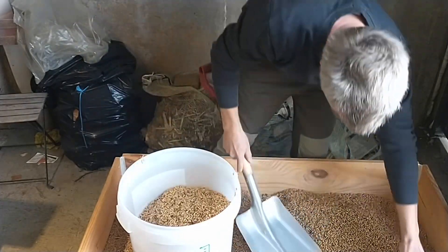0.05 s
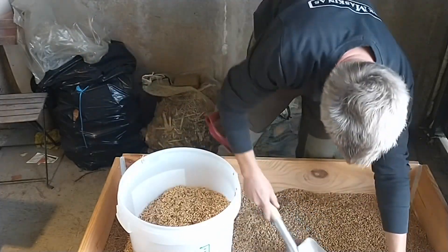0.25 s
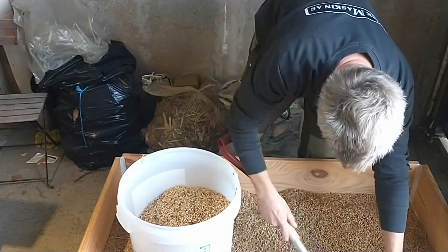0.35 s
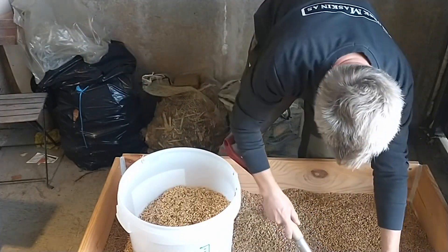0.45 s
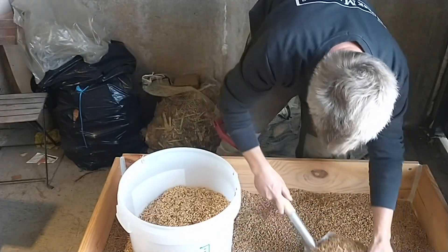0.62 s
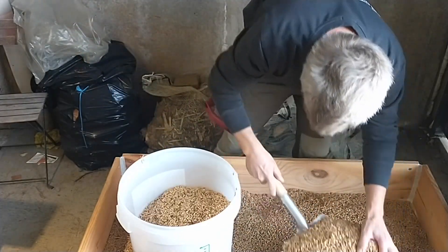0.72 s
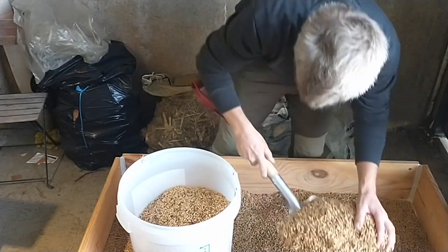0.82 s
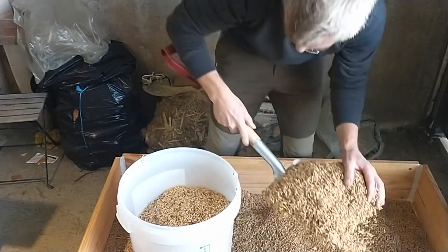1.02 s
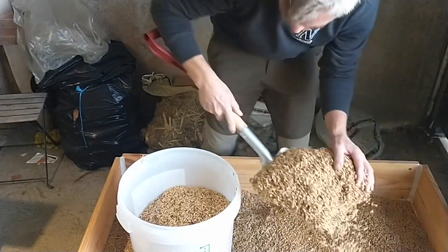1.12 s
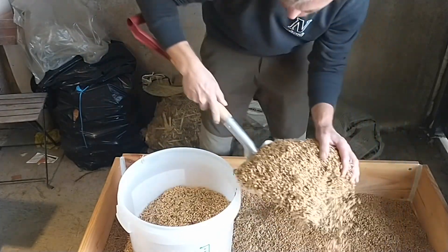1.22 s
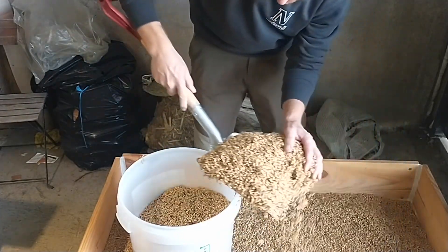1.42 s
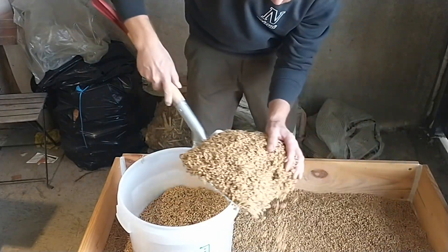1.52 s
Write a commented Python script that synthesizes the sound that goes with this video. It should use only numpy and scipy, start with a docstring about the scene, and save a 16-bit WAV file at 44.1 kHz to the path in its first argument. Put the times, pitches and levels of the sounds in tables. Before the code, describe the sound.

A metal shovel drives into loose grain with a loud, hissing crunch, its blade juddering and ringing while the wooden box booms. Then grain trickles softly off the lifted blade and stray kernels tick, close by in a small concrete room.

```python
"""A metal shovel is driven into loose grain in a wooden box, in a small concrete store room.
Kernels rush over the blade, which sticks and slips, ringing itself and the boards with jolts,
groans and a hollow boom. Then the load is lifted: it shifts on the blade, grain trickles back
onto the heap and stray kernels tick as they bounce. Bare walls echo over a faint hum."""
import sys
import numpy as np
from scipy import signal
from scipy.fft import rfft, irfft
from scipy.io import wavfile
from scipy.ndimage import uniform_filter1d

SR = 44100
rng = np.random.default_rng(int(sys.argv[2]) if len(sys.argv) > 2 else 0)


def inscribe(sig):
    """Save sig as 16-bit PCM at rate SR to the path in sys.argv[1].

    A 1-D sig is mono; a 2-D sig holds one channel per row.
    Samples are clipped to [-1, 1] before scaling.
    """
    pcm = np.round(np.clip(np.atleast_2d(sig).T, -1, 1) * 32767)
    wavfile.write(sys.argv[1], SR, pcm.astype(np.int16))


N = 68355
TIME = np.arange(N) / SR
BIN_HZ = np.arange(N + 1) * SR / (2 * N)


def amp(db):
    """Decibels to gain."""
    return 10 ** (np.asarray(db) / 20)


def unit(x):
    """Scale to rms 1."""
    return x / np.sqrt(np.mean(x ** 2))


def fader(table, column=1):
    """Gain over time from one dB column of an envelope."""
    rows = np.array(table)
    return amp(np.interp(TIME, rows[:, 0], rows[:, column]))


def per_bin(points):
    """Join (frequency, value) points on a log-frequency axis."""
    hz, value = np.array(points).T
    return np.interp(np.log(BIN_HZ + 1), np.log(hz), value)


def shape(x, gain):
    """Filter with one gain per frequency."""
    return irfft(rfft(x, 2 * N) * gain)[..., :N]


def colour(x, eq):
    """EQ a white sound and keep its power."""
    return shape(x, unit(amp(per_bin(eq))))


def noise():
    """Two unrelated white noises."""
    return rng.standard_normal((2, N))


def clicks(per_s, spread_db):
    """Two streams of random impacts of uneven size, rms 1."""
    size = amp(spread_db * np.clip(noise(), -2, 2)) * np.sign(noise())
    return unit(size * (rng.random((2, N)) < per_s / SR))


def wander(bandwidth_hz):
    """Smooth random modulation, rms 1."""
    return unit(shape(noise()[0], np.exp(-(BIN_HZ / bandwidth_hz) ** 2)))


def fade(start, decay_s):
    """Instant attack, exponential decay."""
    age = TIME - start
    return (age >= 0) * np.exp(-np.abs(age) / decay_s)


def ring(modes, t60_scale=1):
    """A body's answer to one tap: decaying sines of alternating polarity."""
    out = 0
    for k, (hz, db, t60) in enumerate(modes):
        decay = fade(0, t60 * t60_scale / np.log(1000))
        out = out + (-1) ** k * amp(db) * np.sin(2 * np.pi * hz * TIME) * decay
    return out


def convolve(x, response):
    """Play a stereo signal through a response."""
    return signal.fftconvolve(x, np.atleast_2d(response), axes=1)[:, :N]


# stereo image (frequency [Hz], left-right correlation [0-1])
CORRELATION = [(100, 0.93), (350, .88), (750, 0.49), (1500, 0.09), (3500, 0.08), (16000, 0)]
def stereo(pair, left_treble_db=0.3):
    """Blend two unrelated signals into left and right: narrow bass, wide treble."""
    alike = np.clip(per_bin(CORRELATION), 0, 1)
    blend = np.arcsin(alike) / 2
    lean = amp(np.array([[1], [-1]]) * left_treble_db * (1 - alike) / 2)
    return shape(pair, np.cos(blend) * lean) + shape(pair[::-1], np.sin(blend) * lean)


# EQ of the still air (frequency [Hz], gain [dB])
AIR_EQ = [(18, -58), (30, -12), (75, -16), (645, -24), (774, -37), (837, -6.5), (928, -18), (2250, -21.5),
          (15000, -32)]
# partials of the hum (frequency [Hz], level [dB])
HUM_PARTIALS = [(861, -93.5), (2196, -89.5)]
def room_tone(air_db=-73.5):
    """A bed of still air with a faint hum."""
    hum = sum(np.sqrt(2) * amp(db) * np.sin(2 * np.pi * hz * TIME) for hz, db in HUM_PARTIALS)
    return amp(air_db) * stereo(colour(noise(), AIR_EQ)) + hum


# envelopes of the shovel stroke (time [s], slide level [dB], crunch level [dB])
STROKE_ENVELOPE = [(.132, -93, -100), (.146, -51, -69), (.165, -43, -63), (.205, -37.5, -44.5),
                   (.246, -36, -41.5), (.254, -30.5, -38.5), (.288, -31, -39), (.3, -26, -24.5),
                   (.36, -28, -27), (.39, -25, -29.5), (.435, -30, -23.5), (.452, -29.5, -32.5),
                   (.49, -30, -32.5), (.52, -37.5, -40), (.565, -57, -54), (.635, -90, -48.5),
                   (.7, -82, -59.5), (.8, -112, -79.5)]
# EQs of the bright slide and the mid-heavy crunch (frequency [Hz], gain [dB])
SLIDE_EQ = [(300, -40), (1500, -1.5), (3000, -0.5), (4500, 0.5), (6000, -2), (8500, -3.5), (12000, -5),
            (14000, -9.5), (15500, -15.5)]
CRUNCH_EQ = [(100, -31), (220, -9.5), (420, -3), (560, -4.5), (750, -1.5), (1000, 0), (1500, -5),
             (1900, -5), (2500, -5.5), (3100, -13.5), (5000, -18.5), (16000, -31)]
def grain_rush():
    """Fine kernels hiss over the steel while coarser bursts crunch under the edge."""
    slide = clicks(per_s=9000, spread_db=5) * fader(STROKE_ENVELOPE, column=1)
    crunch = clicks(per_s=1800, spread_db=3) * fader(STROKE_ENVELOPE, column=2)
    return stereo(colour(slide, SLIDE_EQ) + colour(crunch, CRUNCH_EQ))


def stick_slip(modes, envelope):
    """Stick-slip pulses keep a body ringing; the ring is levelled, then follows the envelope."""
    body = stereo(convolve(clicks(per_s=420, spread_db=3), ring(modes)))
    power = uniform_filter1d(np.mean(body ** 2, axis=0), size=3000)
    return body / np.sqrt(power + 1e-9) * envelope


# modes of the free blade (frequency [Hz], relative level [dB], t60 [s])
FREE_BLADE_MODES = [(825, 1, .25), (985, -2.5, 0.4), (1090, -1, 0.144), (1285, 1, 0.26), (1355, 0.5, 0.28),
                    (1508, 8, 0.13), (1781, 2, 0.41), (1918, 1, 0.22), (2125, -3.5, 0.116), (2506, 3, .2),
                    (2960, 1.5, .2), (3646, 3.5, 0.45), (3812, 5.5, 0.14), (4870, 5.5, 0.14)]
# envelope of its ring (time [s], level [dB])
ENTRY_ENVELOPE = [(.135, -90), (.15, -57.5), (.21, -38), (.27, -37), (.33, -40), (.45, -39.5), (.56, -65),
                  (.7, -105)]
def blade_entry():
    """The blade scrapes in and rings freely until it is buried."""
    return stick_slip(FREE_BLADE_MODES, fader(ENTRY_ENVELOPE))


# modes of the buried blade (frequency [Hz], relative level [dB], t60 [s])
BURIED_BLADE_MODES = [(685.6, -6, 0.21), (746.4, 0.5, 0.17), (818, -5, 0.24), (857, -2.5, 0.172),
                      (918, -1, 0.096), (982.4, 1, 0.2), (1130, -2.5, 0.13), (1370, -17, 0.11),
                      (1800, -9, 0.17), (1880, -6.5, 0.13), (2163, -8, 0.14), (2320, -21, 0.07),
                      (2449, -9, 0.22)]
# envelopes of the judder (time [s], blade level [dB], board level [dB])
JUDDER_ENVELOPE = [(.14, -90, -100), (.2, -61, -66), (.28, -43.5, -43), (.31, -35.5, -37),
                   (.38, -27.5, -30.5), (.44, -35, -33), (.5, -41.5, -32.5), (.56, -57, -38),
                   (.64, -58, -47), (.76, -72, -60.5), (.9, -91, -74), (1.1, -100, -94)]
def blade_judder():
    """The buried blade sticks and slips in the grain with a darker ring."""
    return stick_slip(BURIED_BLADE_MODES, fader(JUDDER_ENVELOPE, column=1))


# modes of the wooden boards (frequency [Hz], relative level [dB], t60 [s])
BOARD_MODES = [(189.2, -1, 0.19), (242, 1, 0.27), (334.8, 3, .16), (392.6, -2.5, 0.24), (455.5, -1.5, 0.13),
               (560, -9, .1)]
def board_judder():
    """The stick-slip shakes the boards of the box."""
    return stick_slip(BOARD_MODES, fader(JUDDER_ENVELOPE, column=2))


# modes of the hollow box (frequency [Hz], relative level [dB], t60 [s])
HOLLOW_MODES = [(63.6, -7.5, 0.52), (124.5, 0.5, 0.23), (182.4, 1, 0.26)]
# envelope of its boom (time [s], level [dB])
BOOM_ENVELOPE = [(.15, -91), (.21, -60), (.27, -50), (.36, -38.5), (.5, -45.5), (.58, -47.5), (.7, -52),
                 (.86, -64.5), (.96, -68), (1.2, -75.5), (1.55, -78.5)]
def box_boom():
    """The hollow box booms under the stroke and the falling grain."""
    return stick_slip(HOLLOW_MODES, fader(BOOM_ENVELOPE))


# groan cues (start [s], length [s], pitch [Hz], level [dB])
GROAN_CUES = [(0.19, 0.12, 371, -44), (0.284, 0.029, 131.6, -34), (0.379, 0.07, 181, -33)]
def groans(attack_s=0.011, release_s=0.02, pitch_waver=0.0144, flutter_db=3.5):
    """Brief wavering tones where the blade's chatter along the boards locks onto one resonance."""
    out = 0
    for start, length, hz, db in GROAN_CUES:
        attack = np.clip((TIME - start) / attack_s, 0, 1)
        release = np.exp(-np.maximum(TIME - start - length, 0) / release_s)
        pitch = hz * (1 + pitch_waver * wander(bandwidth_hz=50))
        tone = np.sqrt(2) * np.sin(2 * np.pi * np.cumsum(pitch) / SR)
        level = amp(db + flutter_db * wander(bandwidth_hz=35))
        out = out + level * attack * release * tone
    return out


# sharp slips of the edge (time [s], ring level [dB], crack level [dB])
JOLT_CUES = [(.251, -42, -25), (.26, -31, -33), (.297, -31, -24.5), (.369, -15, -24), (.382, -27, -23),
             (.417, -26.5, -23), (.423, -18, -32), (.433, -22, -34), (.462, -21.5, -33.5),
             (.481, -25.5, -36)]
# EQ of the crack (frequency [Hz], gain [dB])
CRACK_EQ = [(100, -10.5), (400, -5.5), (2000, 3.5), (5000, -8), (12000, -9), (16000, -6)]
def edge_jolts(crack_decay_s=0.0053):
    """The edge breaks free with a crack and a ring that the grain soon smothers."""
    taps, crack_envelope = np.zeros((2, N)), 0
    for start, ring_db, crack_db in JOLT_CUES:
        taps[:, int(start * SR)] += amp(ring_db)
        crack_envelope = crack_envelope + amp(crack_db) * fade(start, crack_decay_s)
    choked = ring(BURIED_BLADE_MODES, t60_scale=0.42)
    rings = convolve(taps, choked / np.abs(choked).max())
    return rings + stereo(colour(noise() * crack_envelope, CRACK_EQ))


# envelope of the falling grain (time [s], level [dB])
TRICKLE_ENVELOPE = [(.55, -85), (.7, -63), (.79, -56.5), (.9, -58), (1.1, -60.5), (1.18, -60),
                    (1.28, -59.5), (1.335, -56), (1.375, -59), (1.46, -57), (1.5, -55.5), (1.55, -57.5)]
# EQ of its patter (frequency [Hz], gain [dB])
TRICKLE_EQ = [(200, -12.5), (600, -6.5), (1050, 4.5), (1600, -4), (2300, 1.5), (3000, -1), (5500, -2),
              (9000, 1), (13000, 0), (15500, -1.5)]
def trickle():
    """A thin stream runs off the lifted blade and lands on the heap."""
    impacts = clicks(per_s=5000, spread_db=3.5) * fader(TRICKLE_ENVELOPE)
    return stereo(colour(impacts, TRICKLE_EQ))


# envelope of the settling load (time [s], level [dB])
SHIFT_ENVELOPE = [(.6, -90), (.7, -61), (.8, -63), (.9, -64.5), (1., -71), (1.15, -75.5), (1.3, -90)]
# EQ of its dull crunch (frequency [Hz], gain [dB])
SHIFT_EQ = [(150, -5), (280, 3), (550, -3), (1000, -0.5), (1600, -2), (2500, -5.5), (5000, -10),
            (15500, -30)]
def load_shift():
    """The load shifts on the blade as it is raised."""
    impacts = clicks(per_s=1800, spread_db=3) * fader(SHIFT_ENVELOPE)
    return stereo(colour(impacts, SHIFT_EQ))


# kernel bounces (time [s], tick level [dB], scatter level [dB])
BOUNCE_CUES = [(1.129, -60, -56), (1.174, -59, -58), (1.245, -62, -60.5), (1.296, -47, -51.5),
               (1.33, -49, -53.5), (1.345, -52, -65), (1.393, -47, -56), (1.429, -41, -52),
               (1.441, -55, -62), (1.479, -38, -49), (1.497, -52, -60), (1.53, -51, -52), (1.546, -45, -53)]
# EQ of the crisp bounces (frequency [Hz], gain [dB])
BOUNCE_EQ = [(400, -32), (1000, -15), (1600, -17), (2300, -5.5), (3000, -23), (6000, -7.5), (9000, 4),
             (13000, 4), (15500, 1.5)]
def stray_kernels(tick_decay_s=0.0022, scatter_decay_s=0.04):
    """Stray kernels bounce, each a sharp tick with a short scatter after it."""
    tick_envelope = sum(amp(db) * fade(start, tick_decay_s) for start, db, _ in BOUNCE_CUES)
    scatter_envelope = sum(amp(db) * fade(start, scatter_decay_s) for start, _, db in BOUNCE_CUES)
    ticks = noise() * tick_envelope
    scatter = clicks(per_s=5000, spread_db=3.5) * scatter_envelope
    return stereo(colour(ticks + scatter, BOUNCE_EQ))


# reverb time of the store room (frequency [Hz], t60 [s])
REVERB_TIMES = [(100, 0.9), (300, .5), (1000, .5), (2500, 0.5258), (3400, 0.39), (5000, 0.2346),
                (8000, 0.14), (16000, 0.15)]
def reverb(x, wet_db=-9, predelay_s=0.005):
    """Diffuse echoes from bare concrete walls; the treble dies first."""
    hiss, tail = noise(), 0
    centres = np.geomspace(60, 16000, 17)
    hz, t60 = np.array(REVERB_TIMES).T
    for centre in centres:
        band = per_bin([(other, float(other == centre)) for other in centres])
        decay_s = np.interp(centre, hz, t60) / np.log(1000)
        tail = tail + shape(hiss, band) * fade(predelay_s, decay_s)
    return amp(wet_db) * stereo(convolve(x, unit(tail) / np.sqrt(N)))


def scene():
    """Blade and grain feed the reverb; the box stays dry, over the room tone."""
    blade = blade_entry() + blade_judder() + edge_jolts()
    box = board_judder() + box_boom() + groans()
    grain = grain_rush() + load_shift() + trickle() + stray_kernels()
    return blade + grain + reverb(blade + grain) + box + room_tone()


def record(dry, low_cut_hz=62, high_cut_hz=15750):
    """Master filters trim the deepest bass and the very top."""
    low_cut = signal.butter(2, low_cut_hz, "high", fs=SR, output="sos")
    high_cut = signal.ellip(10, .2, 80, high_cut_hz, fs=SR, output="sos")
    return signal.sosfilt(high_cut, signal.sosfilt(low_cut, dry))


dry = scene()
out = record(dry)
inscribe(out)
```